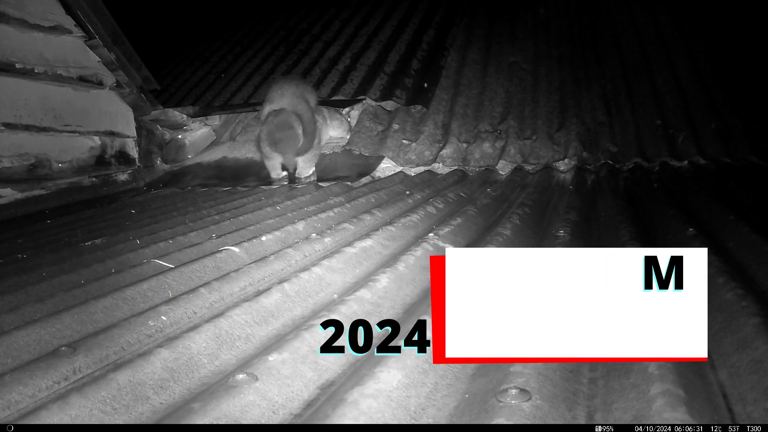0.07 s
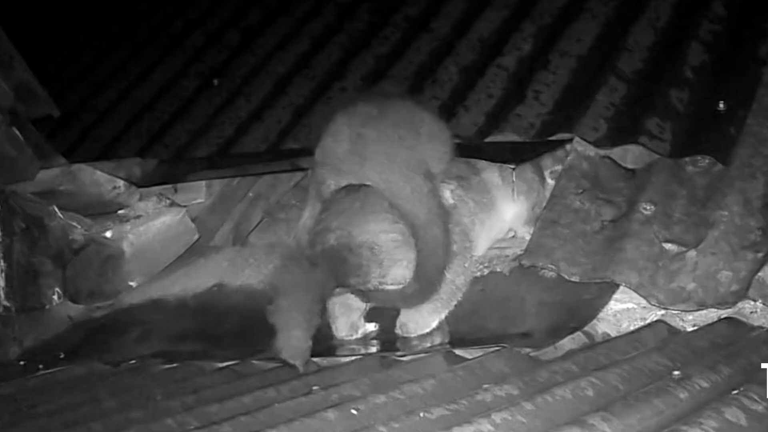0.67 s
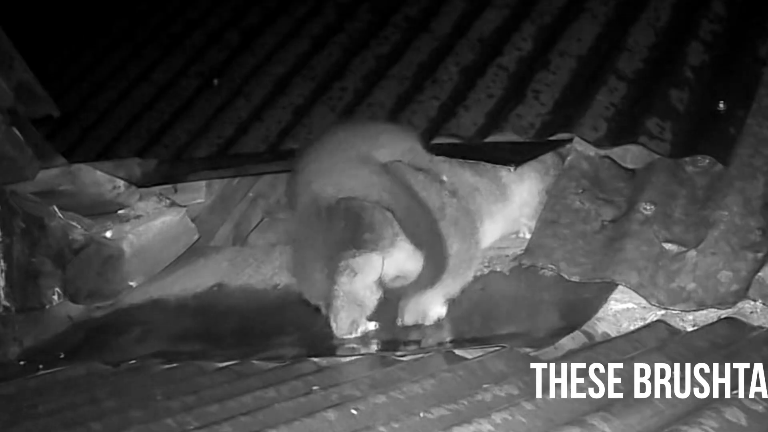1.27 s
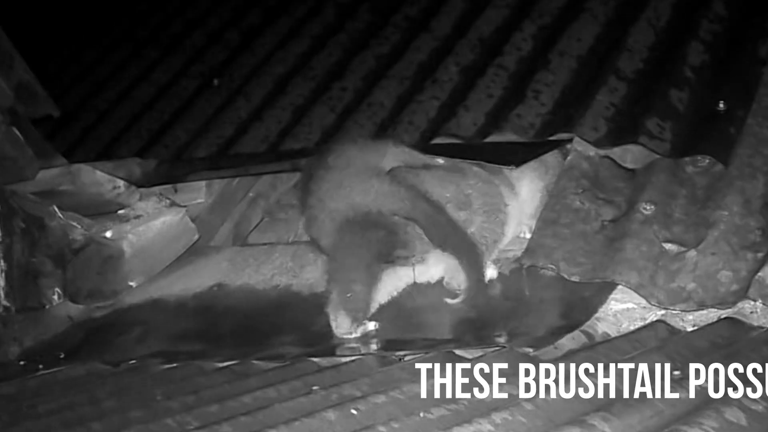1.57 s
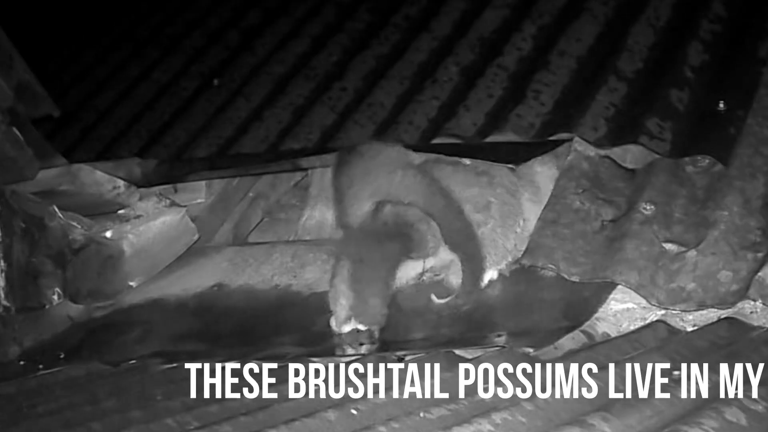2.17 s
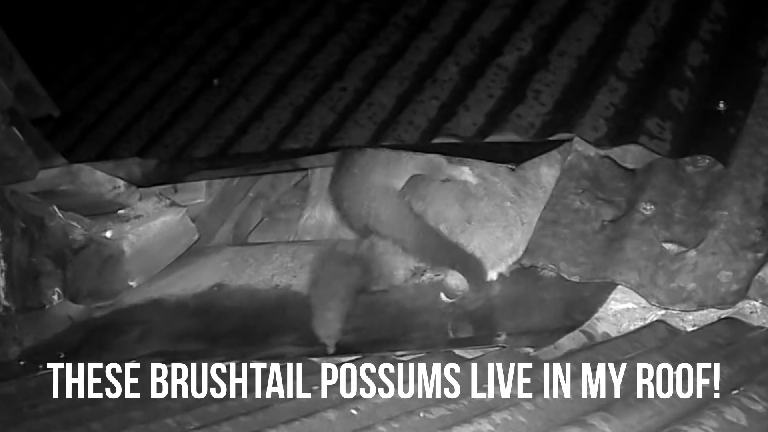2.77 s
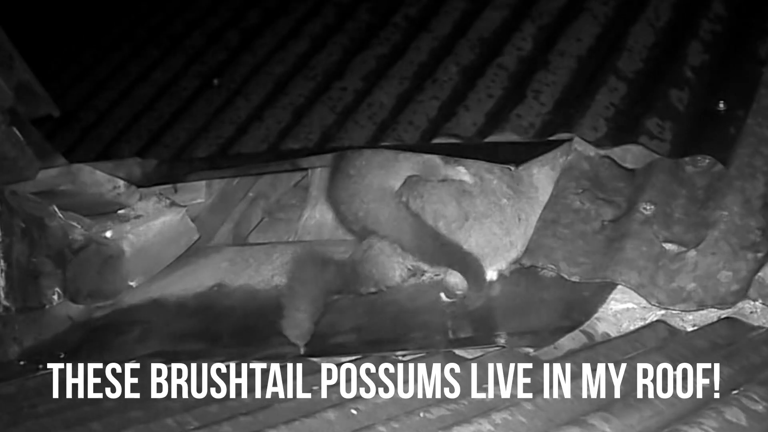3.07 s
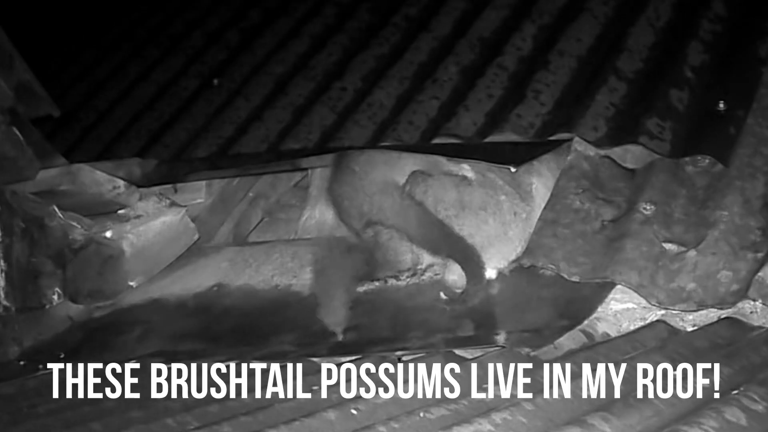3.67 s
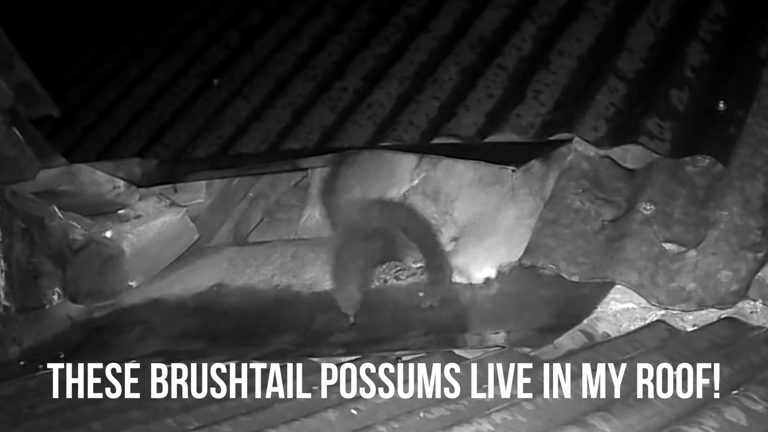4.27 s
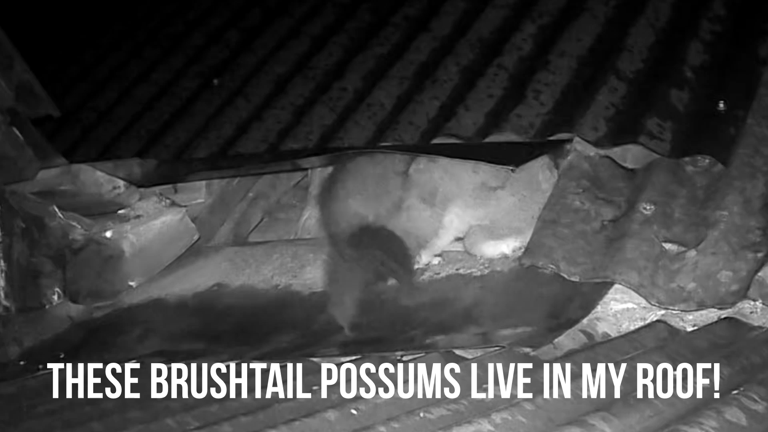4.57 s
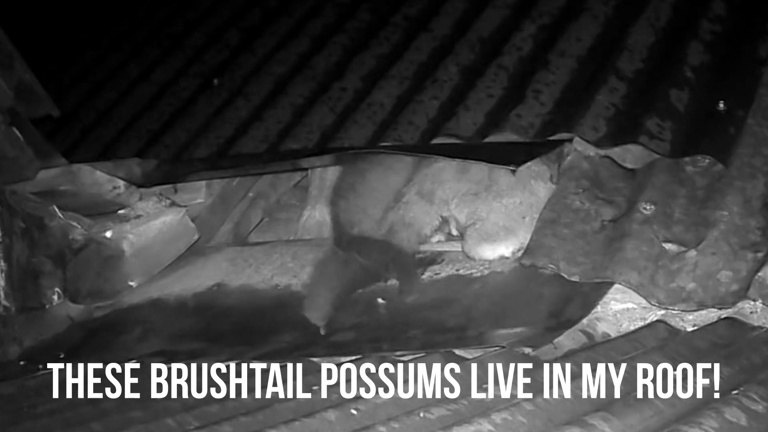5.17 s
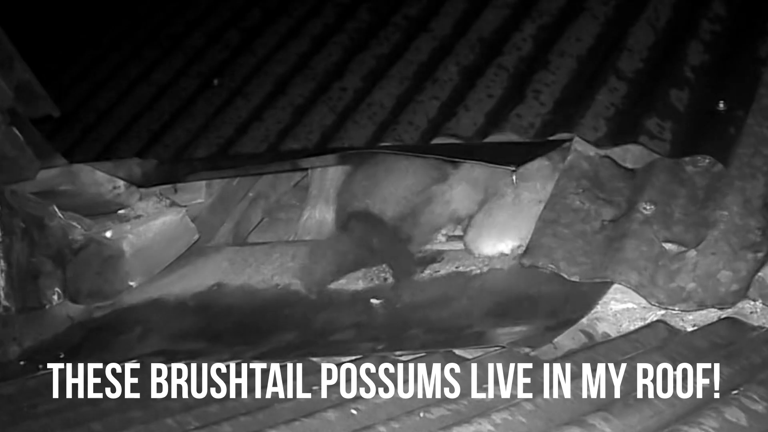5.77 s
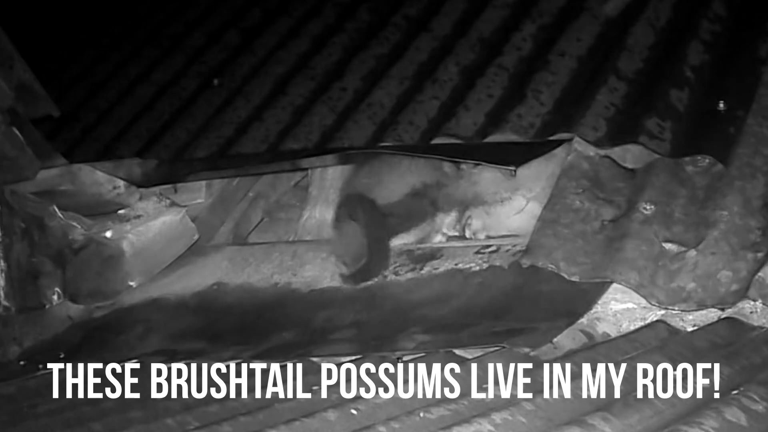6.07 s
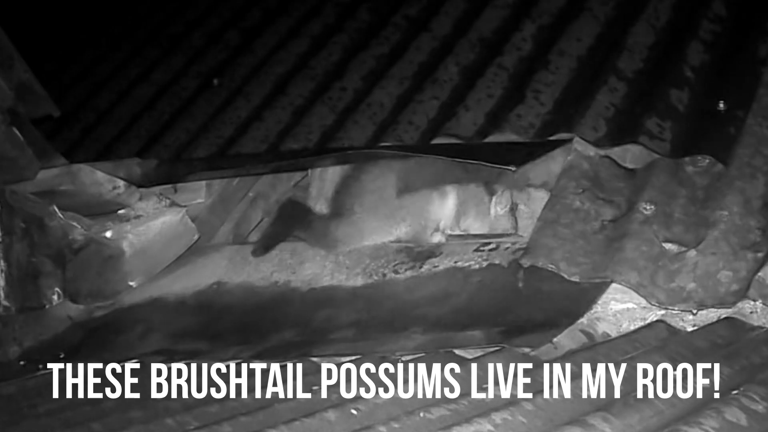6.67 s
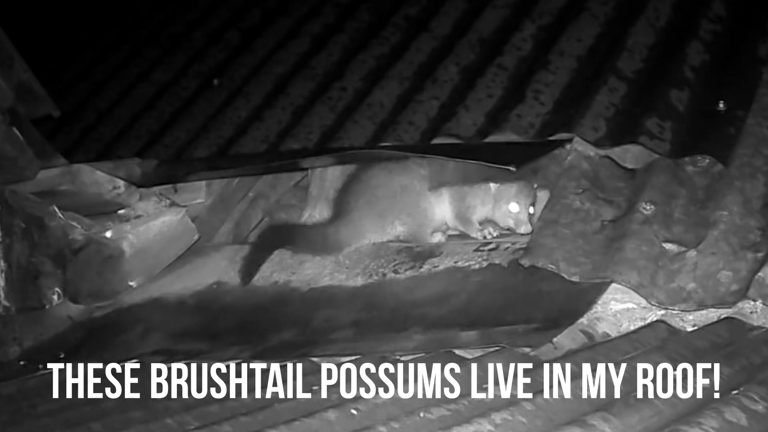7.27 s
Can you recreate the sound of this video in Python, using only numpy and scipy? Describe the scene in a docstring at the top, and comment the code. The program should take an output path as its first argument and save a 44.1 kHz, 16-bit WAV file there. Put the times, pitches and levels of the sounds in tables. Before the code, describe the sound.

Uneven hollow thumps and short scratches come from a possum's paws on a sheet metal roof, with a low rumble underneath.

```python
"""A possum clambers over loose corrugated roofing at night and squeezes into a gap.
Its weight excites the bending modes of the sheets, which thud, boom, murmur and rumble. Friction of
claws and loose edges makes rasps, and fur and paws brush the metal. Damped impacts give small dry
knocks close by, one sharp tick and a distant clink. Two faint whistles sound far off, and the
electronics of a small camera add a steady hiss."""
import sys
import numpy as np
from scipy import signal
from scipy.fft import rfft, irfft, next_fast_len
from scipy.io import wavfile
from scipy.ndimage import uniform_filter1d

SR = 44100
rng = np.random.default_rng(int(sys.argv[2]) if len(sys.argv) > 2 else 0)


def output_pcm(signal):
    """Save a mono or channel-first signal as 16-bit PCM at the path in sys.argv[1].

    Samples are clipped to [-1, 1] before scaling.
    """
    pcm = np.clip(np.atleast_2d(signal).T, -1, 1) * 32767
    wavfile.write(sys.argv[1], SR, np.round(pcm).astype(np.int16))


N = 322459

# Steps on the sheet. Each row: start in seconds, low boom in dB, upper ring in dB,
# frequency favoured by the landing spot in Hz, settling time of the paw in seconds.
STEPS = [(.096, -34, -47, 112, .018), (.19, -49, -61, 131, .05), (.338, -50.5, -55.5, 141, .02),
         (.53, -39, -46.5, 122, 0.018), (.9, -48, -54.5, 111.5, .09), (1.115, -47, -46.5, 135, .03),
         (1.28, -40, -52.5, 120, 0.033), (1.405, -27, -33.5, 220, .035), (1.458, -20, -30, 126, .04),
         (1.51, -21.5, -33.5, 103.5, .035), (1.584, -13, -20.5, 156, .054), (1.68, -28, -37, 138, .02),
         (2.172, -42, -45.5, 117, 0.095), (2.291, -35, -49, 134, 0.014), (2.37, -28, -46.5, 93.3, .03),
         (2.71, -38, -48.5, 106, .03), (2.775, -40, -54, 84, .02), (3.154, -37.5, -50.5, 108, .06),
         (3.324, -28, -27, 168.7, .042), (4.122, -42.5, -49, 103.5, 0.018), (4.292, -34, -46, 98, .09),
         (4.386, -33.5, -38.5, 90, 0.091), (4.665, -41, -59, 140, .06), (5.061, -48.5, -54, 129, .025),
         (5.269, -65, -48, 123, .02), (5.381, -25, -29, 171, .07), (5.842, -46, -47, 176, .035),
         (6.211, -58, -47.5, 120, 0.037), (6.43, -40.5, -80, 88.5, 0.019), (7.16, -45.5, -54, 135, .06)]
# Dry knocks close by. Each row: start in seconds, peak level in dB, pitch in Hz.
DRY_KNOCKS = [(1.084, -38.5, 520), (1.1, -37, 455), (1.145, -31.5, 435), (2.181, -36, 520),
              (2.197, -36, 480), (2.3, -21.5, 766), (2.338, -40, 500), (2.354, -35, 560), (2.419, -36, 534),
              (2.489, -30.5, 360), (2.5, -36.5, 565), (2.669, -45, 495), (2.731, -37, 510),
              (2.862, -47, 516), (7.058, -48, 950)]


def from_db(db):
    """Amplitude grows tenfold with every 20 dB."""
    return 10 ** (np.asarray(db) / 20)


def unit_rms(x):
    """Normalise the mean power to one."""
    return x / np.sqrt(np.mean(x ** 2) + 1e-20)


def unit_burst(x):
    """Normalise the power of the loudest 12 ms to one."""
    return x / np.sqrt(uniform_filter1d(x ** 2, size=530).max() + 1e-20)


def in_time(rows):
    """Interpolate linearly between timed rows, giving one curve a column."""
    times, *columns = np.transpose(rows)
    return [np.interp(np.arange(N) / SR, times, column) for column in columns]


def add(out, start, sound):
    """Superpose a sound from a start in seconds."""
    at = int(start * SR)
    out[at:at + len(sound)] += sound[:N - at]


def low_pass(x, order, top_hz):
    """Above its corner the filter falls by about 6 dB an octave for each order."""
    return signal.sosfilt(signal.butter(order, top_hz, fs=SR, output="sos"), x)


def noise(colour, count):
    """White noise shaped to a spectrum of (Hz, dB) points, at unit rms."""
    hz, db = np.transpose(colour)
    size = next_fast_len(count)
    freqs = np.maximum(np.fft.rfftfreq(size, 1 / SR), 1)
    gain = from_db(np.interp(np.log(freqs), np.log(hz), db))
    gain *= np.minimum(freqs / hz[0], 1) * np.minimum(hz[-1] / freqs, 1) ** 2
    spectrum = rfft(rng.standard_normal(size)) * gain
    return unit_rms(irfft(spectrum, size)[:count])


def swell(t, peak_s):
    """A push rises to one at peak_s and relaxes exponentially."""
    return t / peak_s * np.exp(1 - t / peak_s)


def ring(force, hz, t60):
    """A driven mode is a damped oscillator that decays by 60 dB in t60 seconds."""
    r, w = np.exp(-np.log(1000) / (t60 * SR)), 2 * np.pi * hz / SR
    return signal.lfilter([np.sin(w), 0, -np.sin(w)], [1, -2 * r * np.cos(w), r * r], force + 1e-18)


def struck(force, modes):
    """Modal superposition: one force drives every (Hz, dB, t60) mode and the responses add."""
    return sum(from_db(db) * unit_burst(ring(force, hz, t60)) for hz, db, t60 in modes)


def footfalls():
    """A paw delivers its momentum in three contacts: toes, sole and heel."""
    # Each row: delay as a share of the settling time, boom offset in dB, ring offset in dB.
    contacts = [(0, -6, -1.5), (0.501, -0.5, -1.5), (0.999, -1.5, -8.5)]
    return [(start + share * settle_s, boom_db + boom_offset, ring_db + ring_offset, spot_hz)
            for start, boom_db, ring_db, spot_hz, settle_s in STEPS
            for share, boom_offset, ring_offset in contacts]


def thuds(rise_s=0.0048, spread_s=0.036, tail_db=-14, split_hz=230, miss_db_per_octave=22.5, flex_db=-7):
    """Each paw excites bending modes; most energy soon spreads into the roof, and the rest rings on."""
    # Bending modes of the sheet. Each row: frequency in Hz, level in dB, t60 in seconds.
    sheet_modes = [(77.9, 1.5, 0.26), (95.2, -4.5, 0.94), (114.9, -9.5, 0.29), (132.45, -2.5, 0.65),
                   (143, -2.5, 0.98), (163.2, -10.5, 0.36), (185.1, 0.5, 0.51), (225.3, -4, 0.31),
                   (250.3, -2, 0.69), (269.6, -6, 0.93), (292, -19.5, 0.22), (339.1, 1.5, 0.21),
                   (344.3, -1, 0.33), (366.3, -10, 0.16), (368.5, -10.5, 0.32), (441, -16.5, 0.36),
                   (477.6, -28, 0.23), (543, -22, 0.44), (588, -27.5, .35)]
    # The many weak modes of the roof around merge into noise. Each point: frequency in Hz, level in dB.
    low_flex = [(60, -13), (100, 4), (200, -11), (260, -21)]
    upper_flex = [(180, -30), (235, 0), (345, -2), (425, -22), (900, -48)]
    out, t = np.zeros(N), np.arange(SR) / SR
    hz, mode_db, t60 = np.transpose(sheet_modes)[:, :, None]
    low = hz[:, 0] < split_hz
    attack = 1 - np.exp(-(t / rise_s) ** 2)
    tail = from_db(tail_db) * np.exp(-np.log(1000) * t / t60)
    envelope = attack * (np.exp(-t / spread_s) + tail)
    for start, boom_db, ring_db, spot_hz in footfalls():
        # Low modes far from the favoured frequency are hardly moved.
        missed_db = miss_db_per_octave * np.abs(np.log2(hz / spot_hz)) * low[:, None]
        gain = from_db(mode_db - missed_db + 0.5 * rng.standard_normal(hz.shape))
        modes = gain * envelope * np.sin(2 * np.pi * (hz * t + rng.random(hz.shape)))
        for band, colour, db in [(low, low_flex, boom_db), (~low, upper_flex, ring_db)]:
            sheet = unit_burst(modes[band].sum(axis=0))
            flex = unit_burst(noise(colour, len(t)) * envelope[band].mean(axis=0))
            add(out, start, from_db(db) * unit_burst(sheet + from_db(flex_db) * flex))
    return out


def rasps(tail_db=-5, tail_t60=0.3, tail_top_hz=3200, modes_db=-5, top_hz=4300, clatter_db_per_octave=14):
    """Friction of claws and edges drives a scrape and a lower clatter; damping takes the treble first."""
    # Each row: start in seconds, level in dB, swell in seconds, clatter against scrape in dB.
    rubs = [(1.273, -58, .007, -17), (1.418, -60, .016, -6), (1.461, -49, 0.0059, 2.5),
            (1.512, -54, .0075, 5), (1.572, -49, 0.0032, -5), (1.586, -37.5, 0.0073, 2),
            (1.612, -41, 0.01, 18), (2.225, -59, .017, 3), (3.87, -60, .008, 8), (4.303, -52, 0.014, -8.5),
            (4.384, -57.5, 0.0065, 12), (4.421, -54, 0.013, 2), (4.797, -56, .015, -14),
            (5.381, -47, 0.01, 3.5), (5.406, -50.5, 0.013, 5), (6.216, -63, .006, 8),
            (6.612, -59, 0.012, 7), (7.135, -64.5, 0.0072, -13)]
    # Spectra of the scrape and the clatter. Each row: frequency in Hz, level in dB.
    scrape_colour = [(900, -0.5), (1500, -7.5), (1900, 4), (2300, 2.5), (3100, 2), (4000, -8.5),
                     (6000, -10), (10000, -7.5), (15000, -35)]
    clatter_colour = [(350, -16), (550, -10.5), (880, -12.5), (1200, -15), (1600, -20.5), (2600, -20.5)]
    # Higher modes woken by rubbing. Each row: frequency in Hz, level in dB, t60 in seconds.
    clatter_modes = [(566, 10.5, 0.4), (670, -5, 0.41), (870, -15, 0.12), (857, 18.5, 0.19),
                     (1110, -5, 0.13), (1164, -17, 0.27), (1380, -17, .2), (1900, -10, 0.3), (2140, 0, .2),
                     (2860, -19, 0.22)]
    out, t = np.zeros(N), np.arange(SR // 2) / SR

    def friction(colour, stroke, tail):
        """Broadband noise during the stroke leaves a duller decay."""
        direct = stroke * noise(colour, len(t))
        decay = low_pass(tail * noise(colour, len(t)), 4, tail_top_hz)
        return unit_burst(direct + decay)

    for start, db, swell_s, clatter_db in rubs:
        stroke = swell(t, swell_s)
        tail = from_db(tail_db) * (1 - np.exp(-t / swell_s)) * np.exp(-np.log(1000) * t / tail_t60)
        scrape = friction(scrape_colour, stroke, tail)
        rattle = friction(clatter_colour, stroke, tail)
        ringing = unit_burst(struck(stroke * rng.standard_normal(len(t)), clatter_modes))
        clatter = from_db(clatter_db) * unit_burst(rattle + from_db(modes_db) * ringing)
        corner_hz = top_hz * 2 ** (-clatter_db / clatter_db_per_octave)   # more clatter, duller rasp
        add(out, start, from_db(db) * unit_burst(low_pass(scrape + clatter, 2, corner_hz)))
    return out


def knocks(t60_cycles=0.97, body_hz=260, body_db=-3.5, rebound_s=0.017, rebound_db=-14):
    """Heavily damped impacts sound over a short hollow body tone; each rebounds, weaker and duller."""
    out, impulse = np.zeros(N), signal.unit_impulse(SR // 20)
    rebounds = [(start + rebound_s, db + rebound_db, 0.72 * hz) for start, db, hz in DRY_KNOCKS]
    for start, db, hz in list(DRY_KNOCKS) + rebounds:
        contact = ring(impulse, hz, t60_cycles / hz)
        body = from_db(body_db) * ring(impulse, body_hz, t60=0.01)
        knock = low_pass(contact + body, 7, top_hz=1.1 * hz)
        add(out, start, from_db(db) * knock / np.abs(knock).max())
    return out


def brushes(lead_s=0.02, knock_swell_s=0.017, knock_offset_db=-22.5, step_offset_db=-23):
    """Soft contact carries little treble: fur and pads brush the metal at every knock and step."""
    # Spectrum of the brushing. Each row: frequency in Hz, level in dB.
    brush_colour = [(300, -20.5), (420, 4), (540, -3.5), (650, -16.5), (800, -21), (1100, -22.5)]
    out, t = np.zeros(N), np.arange(SR // 3) / SR
    strokes = [(start - lead_s, db + knock_offset_db, knock_swell_s) for start, db, _ in DRY_KNOCKS]
    strokes += [(start, ring_db + step_offset_db, 0.36 * settle_s)
                for start, _, ring_db, _, settle_s in STEPS]
    for start, db, swell_s in strokes:
        add(out, start, from_db(db) * unit_burst(swell(t, swell_s) * noise(brush_colour, len(t))))
    return out


def tap(modes, start, peak_db, contact_s, top_hz):
    """A hard contact chatters for an instant, then the modes decay freely."""
    out, t = np.zeros(N), np.arange(SR // 4) / SR
    force = rng.standard_normal(len(t)) * swell(t, contact_s)
    sound = low_pass(struck(force, modes), 10, top_hz)
    add(out, start, from_db(peak_db) * sound / np.abs(sound).max())
    return out


def tick():
    """A very brief contact excites a wide band of fast-dying modes: one sharp tick."""
    # Each row: frequency in Hz, level in dB, t60 in seconds.
    tick_modes = [(215, -13, .04), (560, -12, .012), (880, -9, .014), (1005, -6, .018), (1190, -6, .02),
                  (1480, -8, .014), (2200, -3, .011), (2400, -6, .011), (2900, -10, .005), (3290, -8, .008),
                  (4200, -9, .007), (5300, -12, .004), (6277, -2, .008), (8000, -15, .005)]
    return tap(tick_modes, start=4.1002, peak_db=-25.5, contact_s=0.0014, top_hz=7800)


def clink():
    """A few lightly damped modes ring after a contact: one light, distant clink."""
    # Each row: frequency in Hz, level in dB, t60 in seconds.
    clink_modes = [(870, -3, 0.78), (1020, 6, 0.15), (1130, 6, 0.12), (1190, -9, .14)]
    return tap(clink_modes, start=0.356, peak_db=-50, contact_s=0.0032, top_hz=1600)


def shuffle(uneven_db=3):
    """Shifting weight forces the sheet irregularly and keeps it murmuring between steps."""
    # Course of the murmur. Each row: time in seconds, level in dB.
    murmur_levels = [(0, -57), (.28, -51), (.45, -54), (.85, -54.5), (1.3, -47.5), (1.7, -44.5),
                     (2.07, -55.5), (2.4, -49.5), (3.05, -53), (3.45, -44.5), (3.7, -56.5), (4.05, -51.5),
                     (4.5, -46.5), (5.3, -57), (5.6, -47.5), (6.05, -56), (6.55, -46.5), (6.9, -62.5),
                     (7.31, -53.5)]
    # Its spectrum. Each row: frequency in Hz, level in dB.
    murmur_colour = [(45, -34.5), (70, -1), (100, 2.5), (140, 1.5), (190, -0.5), (260, -10.5), (345, -4.5),
                     (420, -19), (700, -37)]
    uneven = from_db(uneven_db * noise([(2, 21.5), (14, -5.5), (30, -29)], N))
    return from_db(in_time(murmur_levels)[0]) * uneven * noise(murmur_colour, N)


def rumble(sway_db=-31, sway_per_boom_db=0.64, sway_rise_s=0.11):
    """Incoherent vibrations add in power: each step lays a swell of sway over the roof's slow rumble."""
    # Course of the underlying rumble. Each row: time in seconds, level in dB.
    rumble_levels = [(0, -53.5), (.7, -57), (1.0, -45), (2.0, -49), (2.3, -42), (3.0, -51.5), (3.9, -63),
                     (4.5, -48.5), (5.2, -54), (6.9, -56.5), (7.31, -54)]
    # Its spectrum. Each row: frequency in Hz, level in dB.
    rumble_colour = [(10, 6.5), (20, 6), (32, -3), (50, 4), (70, -1.5), (120, -40)]
    power, t = from_db(in_time(rumble_levels)[0]) ** 2, np.arange(SR) / SR
    for start, boom_db, *_ in STEPS:
        sway = from_db(sway_db + sway_per_boom_db * boom_db) * swell(t, sway_rise_s)
        add(power, start, sway ** 2)
    return np.sqrt(power) * noise(rumble_colour, N)


def whistles():
    """Random frequency and amplitude modulation makes two thin, far-off tones waver."""
    # One path a whistle. Each row: time in seconds, pitch in Hz, level in dB.
    paths = [
        [(2.45, 1500, -76), (2.55, 1494, -73), (3.0, 1480, -66.5), (3.15, 1470, -75), (3.33, 1510, -70)],
        [(5.9, 2177, -77), (6.15, 2147, -73), (6.35, 2210, -69.5), (6.5, 2140, -90)],
    ]
    # Unsteadiness of each whistle. Each row: pitch waver in Hz, flutter in dB.
    wavers = [(4, 2), (45, 4.5)]
    out, t = np.zeros(N), np.arange(N) / SR
    waver_colour = [(5, 0), (40, -3), (90, -20)]
    for path, (waver_hz, flutter_db) in zip(paths, wavers):
        hz, db = in_time(path)
        hz = hz + waver_hz * noise(waver_colour, N)
        gain = from_db(db + flutter_db * noise(waver_colour, N))
        sounding = (t > path[0][0]) * (t < path[-1][0])
        out += sounding * gain * np.sin(2 * np.pi * np.cumsum(hz) / SR)
    return out


def electronics(hiss_db=-61, tone_hz=10001, tone_db=-87):
    """The camera's self-noise is a broadband hiss with narrowband whines and a thin steady tone."""
    # Spectrum of the hiss. Each row: frequency in Hz, level in dB.
    hiss_colour = [(260, 3.5), (450, -0.5), (514, -1), (570, -2.5), (734, -3.5), (1020, -1.5), (1470, -5.5),
                   (2190, -5.5), (3320, -8.5), (13600, -13), (15500, -17)]
    # Whines. Each row: centre in Hz, bandwidth in Hz, level in dB.
    whines = [(6060, 220, -86), (13800, 250, -79.5)]
    out = from_db(tone_db) * np.sqrt(2) * np.sin(2 * np.pi * tone_hz * np.arange(N) / SR)
    for hz, width_hz, db in whines:
        t60 = np.log(1000) / (np.pi * width_hz)
        out += from_db(db) * unit_rms(ring(rng.standard_normal(N), hz, t60))
    return out + from_db(hiss_db) * noise(hiss_colour, N)


def scene():
    """All sources superpose in one channel."""
    possum = thuds() + rasps() + knocks() + brushes() + tick() + clink() + shuffle() + rumble()
    return (possum + whistles() + electronics())[None]


def record(dry):
    """A steep elliptic low-pass limits the bandwidth to 15.5 kHz."""
    return signal.sosfilt(signal.ellip(10, 0.2, 80, 15500, fs=SR, output="sos"), dry)


dry = scene()
out = record(dry)
output_pcm(out)
```